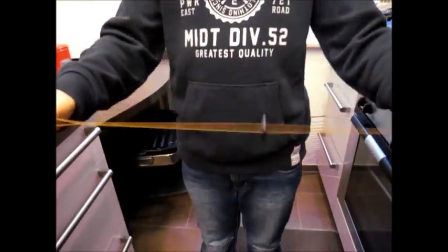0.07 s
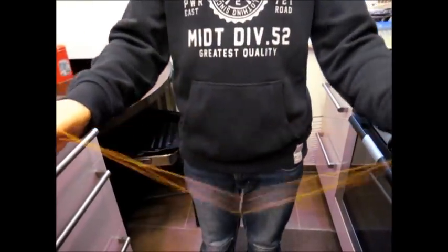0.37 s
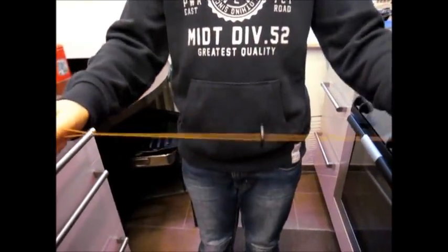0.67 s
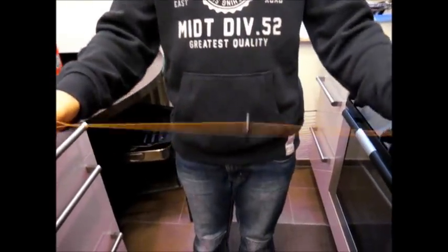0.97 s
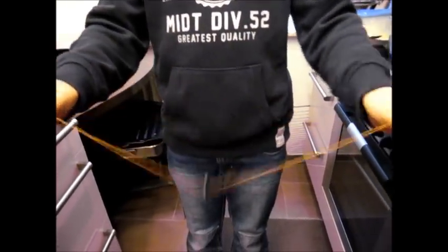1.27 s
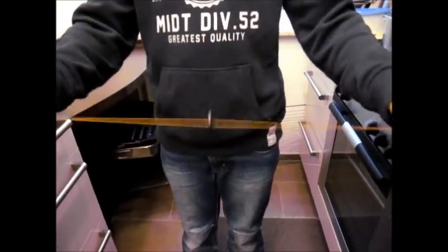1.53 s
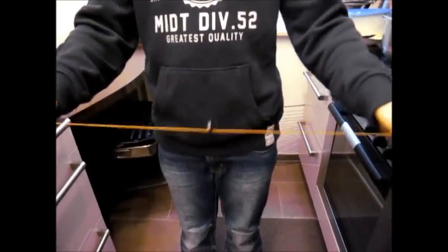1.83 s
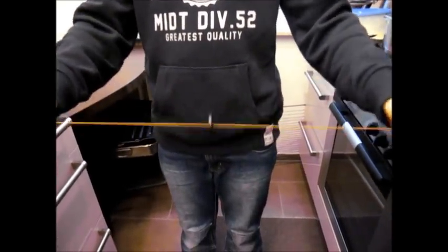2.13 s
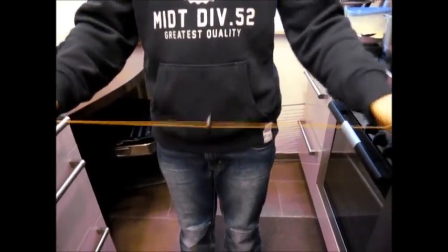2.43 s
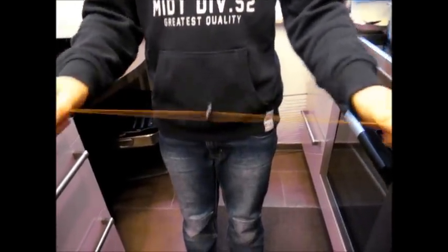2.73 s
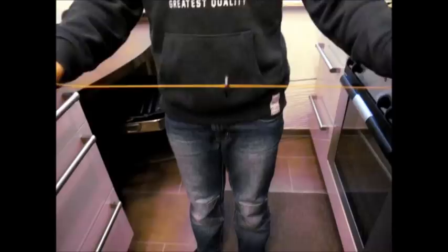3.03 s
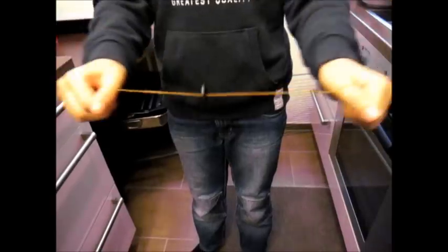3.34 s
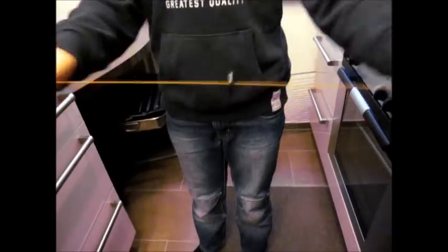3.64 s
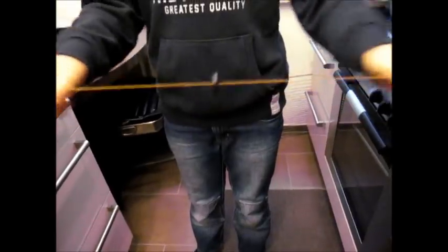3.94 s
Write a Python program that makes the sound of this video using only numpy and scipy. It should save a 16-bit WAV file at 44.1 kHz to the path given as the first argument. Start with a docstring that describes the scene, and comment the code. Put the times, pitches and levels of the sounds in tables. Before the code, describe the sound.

A button spinning on a twisted string whirs close by in a small quiet room. After faint rubbing, soft breathy swooshes swell at about 0.8 and 1.7 seconds. Louder, hissing whistles rise and fall around 2.3, 3 and 3.7 seconds, each higher than the last. The string slaps briefly at each peak, with light ticks between and a sharp click near 2.8 seconds. A very faint thin whine lies underneath.

```python
"""A button whirls on a twisted loop of string, pulled five times, each pull harder, in a small quiet room.
Its speed drives a rush of air and a whistle that rise and fall together. The string slaps as it unwinds
at top speed and ticks, rubs and hums in between. The recorder adds a thin steady whine."""
import sys
import numpy as np
from scipy import signal
from scipy.fft import rfft, irfft
from scipy.io import wavfile
from scipy.ndimage import uniform_filter1d

SR = 44100
rng = np.random.default_rng(int(sys.argv[2]) if len(sys.argv) > 2 else 0)


def dump_mix(stems):
    """Bounce the given channels to the path in sys.argv[1] as a 16-bit WAV at rate SR."""
    frames = np.atleast_2d(stems).T  # one column per channel
    limited = np.clip(frames, -1, 1)  # hard clip at full scale
    pcm = np.round(limited * 32767).astype(np.int16)
    wavfile.write(sys.argv[1], SR, pcm)


N = 176400
TIME_S = np.arange(N) / SR


def amp(db):
    """dB to gain."""
    return 10 ** (np.asarray(db) / 20)


def unit(x):
    """Scale to rms 1."""
    return x / np.sqrt(np.mean(x ** 2) + 1e-20)


def read(points, hz):
    """Interpolate a table over log frequency."""
    f, value = np.transpose(points)
    return np.interp(np.log(hz + 1), np.log(f), value)


def add(mix, start_s, sound):
    """Mix a sound in at start_s."""
    part = mix[round(start_s * SR):][:len(sound)]
    part += sound[:len(part)]


def bins_hz(size=N):
    """FFT bin frequencies."""
    return np.fft.rfftfreq(size, 1 / SR)


def noise(gain):
    """Noise of rms 1, shaped by a gain per bin."""
    return unit(irfft(gain * np.exp(2j * np.pi * rng.random(N // 2 + 1)), N))


def drift(width_hz):
    """Random wander of rms 1."""
    return noise(np.exp(-(bins_hz() / width_hz) ** 2))


def swell(centre_s, sigma_s):
    """Gaussian envelope, peak 1."""
    return np.exp(-.5 * ((TIME_S - centre_s) / sigma_s) ** 2)


def colour(x, db):
    """Minimum-phase filter, dB per bin; keeps the power of white noise."""
    gain = unit(amp(db))
    phase = -signal.hilbert(np.log(np.r_[gain, gain[-2:0:-1]])).imag[:len(gain)]
    return irfft(rfft(x) * gain * np.exp(1j * phase), len(x))


# room tone (frequency [Hz], relative level [dB])
ROOM_TONE_SPECTRUM = [(20, 13.5), (60, 9.5), (150, 5.5), (450, 6.5), (1000, 3), (2000, 0), (5000, -5),
                      (9500, -5), (11000, -9.5), (12000, -1.5), (13500, 1), (15800, -1)]


def background(tone_db=-60.5, whine_hz=5881, whine_db=-63.5):
    """Room tone and the recorder's steady whine."""
    tone = noise(amp(read(ROOM_TONE_SPECTRUM, bins_hz())))
    whine = unit(np.sin(2 * np.pi * whine_hz * TIME_S))
    return amp(tone_db) * tone + amp(whine_db) * whine


# soft rubs (time [s], sigma [s], centre [Hz], width [Hz], level [dB])
RUB_SWELLS = [(0.076, 0.076, 2500, 2500, -69.5), (.16, 0.014, 9100, 2200, -64.5),
              (.205, .015, 9200, 2200, -68), (.34, 0.02, 9000, 2500, -70), (0.432, .025, 647, 550, -62),
              (0.74, 0.0089, 9450, 2000, -54.5), (2.59, 0.041, 87.6, 24.94, -63),
              (3.16, .035, 80, 24.94, -67), (3.295, 0.024, 9500, 1660, -55.5),
              (3.517, 0.038, 959, 501, -62.5), (3.968, 0.015, 1430, 1445, -51),
              (3.986, 0.027, 75, 40.1, -69)]


def rubs():
    """String, hands and sleeves rub: swells of band noise."""
    out = np.zeros(N)
    for time_s, sigma_s, centre_hz, width_hz, db in RUB_SWELLS:
        band = np.exp(-((bins_hz() - centre_hz) / width_hz) ** 2)
        out += amp(db) * swell(time_s, sigma_s) * noise(band)
    return out


# string slips (time [s], level [dB], tilt [dB/octave])
TICK_EVENTS = [(.184, -49, 8), (0.657, -47.5, 7), (0.7313, -44, 9.5), (.7352, -43, 4), (2.512, -41, 2.5),
               (2.577, -43.5, -1), (2.8166, -20, 2), (3.253, -42, -3.5), (3.295, -47, -16)]
# crack of a slip (frequency [Hz], relative level [dB])
TICK_SPECTRUM = [(100, -45), (250, -31), (500, 6), (1100, 9.5), (1800, 17.5), (3000, 4.5), (5000, 2.5),
                 (7000, 6), (9500, 5), (15800, -17)]
# button ring (frequency [Hz], level [dB], t60 [s])
BUTTON_MODES = [(930, -25, .03), (1770, -10.5, 0.017), (3675, -12, 0.025), (9060, -11, 0.016)]


def ticks(rise_s=.00016, decay_s=.00091, pivot_hz=4000, size=2048):
    """The string slips in a hole and the button rings briefly."""
    out, t, f = np.zeros(N), TIME_S[:size], bins_hz(size)
    envelope = np.minimum(t / rise_s, 1) * np.exp(-t / decay_s)
    for time_s, db, tilt_db in TICK_EVENTS:
        spectrum_db = read(TICK_SPECTRUM, f) + tilt_db * np.log2(f / pivot_hz + .1)
        tick = colour(envelope * rng.choice([-1., 1.], size), spectrum_db)
        for hz, mode_db, t60_s in BUTTON_MODES:
            cut_db = min(tilt_db * np.log2(hz / pivot_hz), 0)
            tick += amp(mode_db + cut_db - 60 * t / t60_s) * np.cos(2 * np.pi * hz * t)
        add(out, time_s, amp(db) * tick)
    return out


# string hums (time [s], sigma [s], pitch [Hz], level [dB])
HUM_SWELLS = [(.295, 0.011, 452, -68), (0.324, 0.0073, 465, -58), (1.35, 0.005, 470, -60),
              (2.36, 0.01, 505, -66), (3.497, 0.017, 304, -58), (3.981, 0.0061, 510, -49.5)]


def hums():
    """The taut string sounds short, pure notes."""
    return sum(amp(db) * swell(time_s, sigma_s) * unit(np.sin(2 * np.pi * hz * TIME_S))
               for time_s, sigma_s, hz, db in HUM_SWELLS)


# button speed as whistle pitch, one list per pull (time [s], pitch [Hz])
PULL_CURVES = [
    [(.62, 152.2), (.69, 286.7), (.755, 416), (.82, 316), (.92, 276), (.99, 150)],
    [(1.49, 150), (1.55, 301.3), (1.605, 415), (1.65, 542), (1.695, 428), (1.745, 274), (1.8, 150)],
    [(2.12, 149.5), (2.185, 464), (2.235, 652), (2.3, 775), (2.36, 655.5), (2.43, 568.3), (2.52, 473.7),
     (2.6, 410.6), (2.69, 151.9)],
    [(2.76, 145.1), (2.8, 450.5), (2.84, 700), (2.9, 939.6), (2.945, 1064), (2.985, 1110), (3.025, 1047),
     (3.072, 909), (3.13, 705), (3.22, 528), (3.32, 358.3), (3.42, 153)],
    [(3.46, 149.5), (3.52, 370), (3.57, 608), (3.61, 840), (3.65, 1073), (3.695, 1200), (3.742, 1267),
     (3.82, 1132), (3.91, 840), (3.955, 662), (4.0, 499)],
]
REFERENCE_HZ = 1067  # air and whistle levels grow per octave from this pitch


def spin(inertia_s=.023):
    """Whistle pitch in Hz, smoothed by the button's inertia."""
    time_s, hz = np.transpose(sum(PULL_CURVES, []))
    return uniform_filter1d(np.interp(TIME_S, time_s, hz), int(inertia_s * SR))


# air hiss and rush (frequency [Hz], relative level [dB])
HISS_SPECTRUM = [(200, -42), (2500, -63.5), (4000, -11), (5500, -3.5), (7000, -2.5), (9000, 3.5),
                 (10300, -1), (12500, -5.5), (15800, -11)]
RUSH_SPECTRUM = [(100, -18), (280, -16), (500, -2.5), (900, -3), (1500, -0.5), (2300, 4.5), (3300, 7.5),
                 (5500, 4), (9000, -22), (15800, -20)]


def air(pitch_hz, hiss_db=-32, hiss_db_per_oct=19.5, rush_db=-46.5, rush_db_per_oct=10):
    """The whirling string cuts the air: a broad rush, and a hiss that takes over at speed."""
    octaves = np.log2(pitch_hz / REFERENCE_HZ)
    hiss = amp(hiss_db + hiss_db_per_oct * octaves) * noise(amp(read(HISS_SPECTRUM, bins_hz())))
    rush = amp(rush_db + rush_db_per_oct * octaves) * noise(amp(read(RUSH_SPECTRUM, bins_hz())))
    flutter_db = .67 * drift(width_hz=250)
    return (hiss + rush) * amp(flutter_db)


# whistle per pull (level [dB], extra breath [0-1], fade after top speed [dB/s])
PULL_VOICING = [(10, 0.9, 38), (2.5, 0.72, 22), (-1.5, 0.98, 2), (-1, 0.15, 34), (-0.5, 0, 13)]


def voicing(slack_lead_s=.035, slack_ramp_s=.06):
    """Level, breath and slack: the whistle fades once the string starts to wind up again."""
    db, breath, slack = np.zeros((3, N))
    for pull, (level_db, share, fade_db_per_s) in zip(PULL_CURVES, PULL_VOICING):
        started = TIME_S >= pull[0][0]
        peak_s = max(pull, key=lambda row: row[1])[0]
        past_peak_s = TIME_S[started] - peak_s
        db[started] = level_db - fade_db_per_s * np.maximum(past_peak_s, 0)
        breath[started] = share
        slack[started] = np.clip((past_peak_s + slack_lead_s) / slack_ramp_s, 0, 1)
    return db, breath, slack


# whistle partials (pitch ratio, level [dB], growth [dB/octave], width [Hz], breath [0-1], slack drop [dB])
PARTIALS = [(.485, -49.5, 27, 27.3, 0.44, 9), (1, -42.5, 24.5, 56.3, 0.1, -1),
            (1.46, -65.5, 28, 39.26, .5, 3), (1.96, -60.5, 31, 40, 0.51, 9)]


def whistle(pitch_hz, waver_depth=.0027, waver_hz=40):
    """The button's holes chop the air: gliding partials, part pure and part breathy."""
    turn = 2 * np.pi * np.cumsum(pitch_hz * (1 + waver_depth * drift(waver_hz))) / SR
    octaves = np.log2(pitch_hz / REFERENCE_HZ)
    pull_db, pull_breath, slack = voicing()
    out = np.zeros(N)
    for ratio, db, db_per_oct, width_hz, breath, drop_db in PARTIALS:
        phase = ratio * turn
        pure = np.sqrt(2) * np.sin(phase)
        breathy = drift(width_hz) * np.cos(phase) + drift(width_hz) * np.sin(phase)
        share = np.clip(breath + pull_breath, 0, 1)
        tone = ((1 - share) * pure + share * breathy) / np.hypot(1 - share, share)
        out += amp(db + pull_db - drop_db * slack + db_per_oct * octaves) * tone
    return out


# string slaps (time [s], level [dB], treble shelf [dB], hollow note [dB])
SLAP_EVENTS = [(.7605, -52, -9, -10), (1.651, -44.5, -8, -4), (2.3074, -28.5, -5, -2),
               (2.9976, -21, -5, -16), (3.7545, -30, -4, -14)]
# crack of a slap (frequency [Hz], relative level [dB])
SLAP_SPECTRUM = [(100, -14), (250, -24.5), (400, -9), (530, 6.5), (750, -3.5), (1100, 2), (1500, -1.5),
                 (2200, 2), (3000, -1), (4000, -6), (6000, -1.5), (9000, -0.5), (15800, -9.5)]


def slaps(crack_s=.0022, rattle_s=.024, rattle_db=-11.5, note_hz=505, note_s=.007, shelf_hz=3000):
    """The unwinding strands knock together: a short crack, a hollow note and a dying rattle."""
    size = 8192
    out, t, f = np.zeros(N), TIME_S[:size], bins_hz(size)
    envelope = np.exp(-(t / crack_s) ** 4 / 2) + amp(rattle_db) * np.exp(-t / rattle_s)
    note = (np.exp(-t / note_s) - np.exp(-t / crack_s)) * np.sin(2 * np.pi * note_hz * t)
    for time_s, db, treble_db, note_db in SLAP_EVENTS:
        spectrum_db = read(SLAP_SPECTRUM, f) + treble_db * f / (f + shelf_hz)
        crack = colour(envelope * rng.standard_normal(size), spectrum_db)
        add(out, time_s, amp(db) * (crack + amp(note_db) * note))
    return out


# room decay (frequency [Hz], t60 [s])
ROOM_DECAY = [(200, 0.54), (1000, 0.39), (4000, .35), (12000, 0.59)]


def room(x, delay_s=.004):
    """A short diffuse tail that dies fastest near 4 kHz."""
    hz, t, spectra = signal.stft(rng.standard_normal(SR // 2), SR, nperseg=256)
    decay = amp(-60 * t / read(ROOM_DECAY, hz)[:, None])
    tail = signal.istft(spectra * decay, SR, nperseg=256)[1]
    tail *= np.arange(len(tail)) > delay_s * SR
    return signal.fftconvolve(x, tail / np.linalg.norm(tail))[:N]


def scene(whirr_send_db=-5, handling_send_db=-11):
    """The toy close by, its echo and the quiet room, in mono."""
    pitch_hz = spin()
    whirr = air(pitch_hz) + whistle(pitch_hz) + slaps()
    handling = ticks() + rubs() + hums()
    echo = room(amp(whirr_send_db) * whirr + amp(handling_send_db) * handling)
    return (whirr + handling + echo + background())[None]


# microphone response (frequency [Hz], gain [dB])
MIC_RESPONSE = [(10300, 0), (11200, -7), (11600, -18), (11780, -36), (12000, -20), (12500, -14),
                (15800, -13)]


def record(dry, cutoff_hz=15850):
    """Microphone colour with a notch in the top octave, then a low-pass."""
    mic_gain = amp(read(MIC_RESPONSE, bins_hz(2 * N)))
    coloured = irfft(rfft(dry, 2 * N) * mic_gain)[:, :N]
    lowpass = signal.firwin(511, cutoff_hz, window=("kaiser", 9), fs=SR)
    return signal.oaconvolve(coloured, lowpass[None], "same")


dry = scene()
out = record(dry)
dump_mix(out)
```